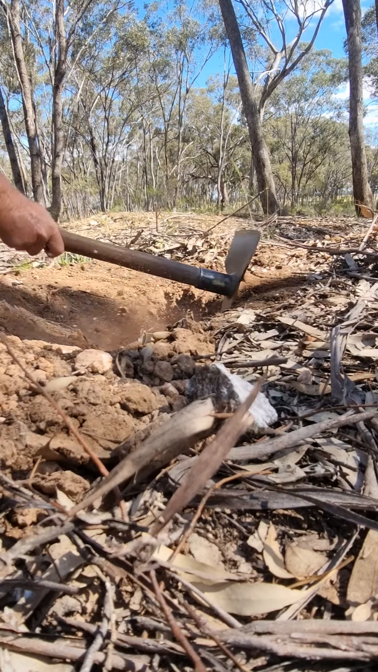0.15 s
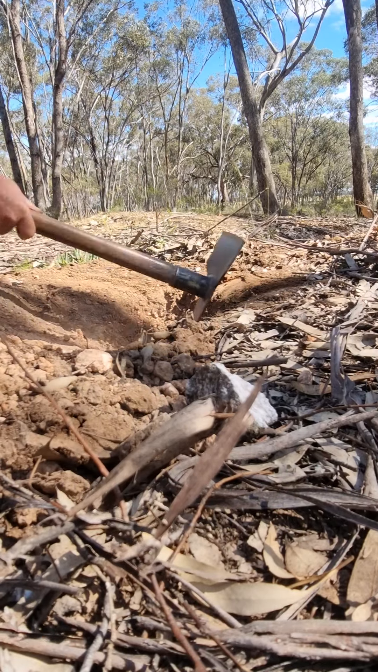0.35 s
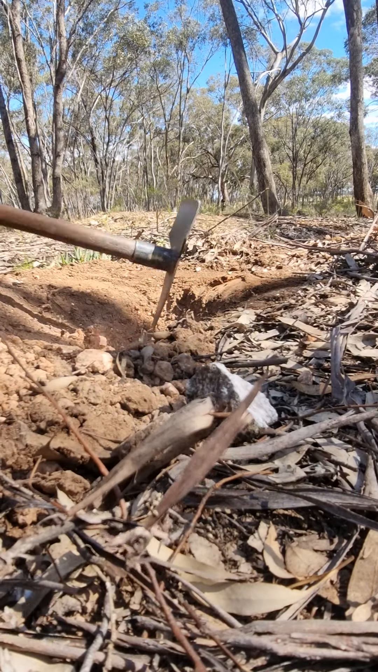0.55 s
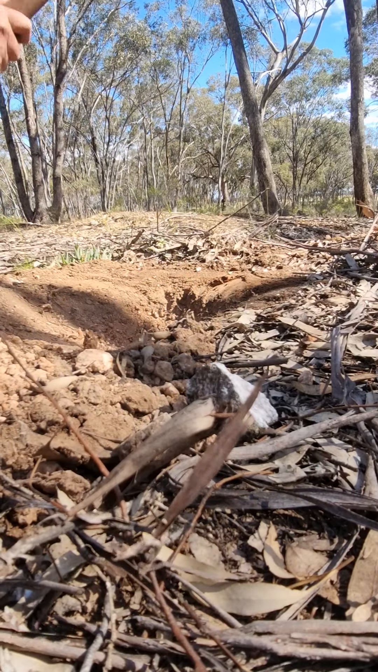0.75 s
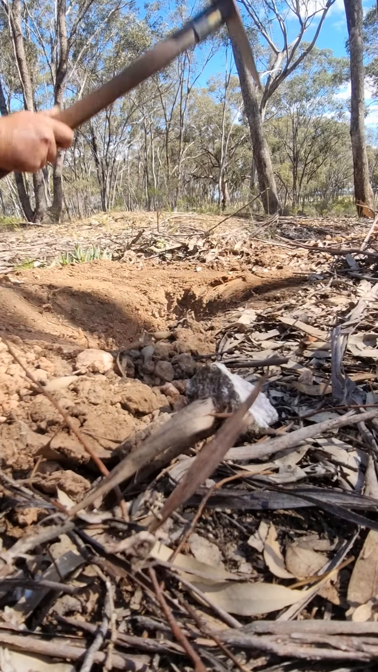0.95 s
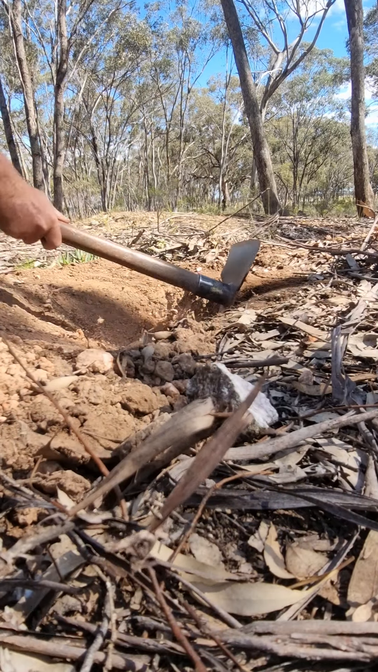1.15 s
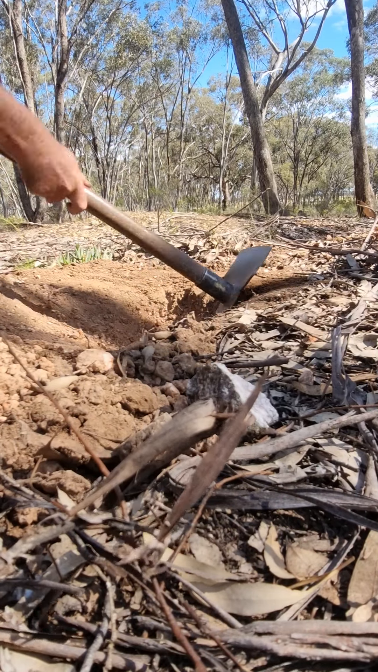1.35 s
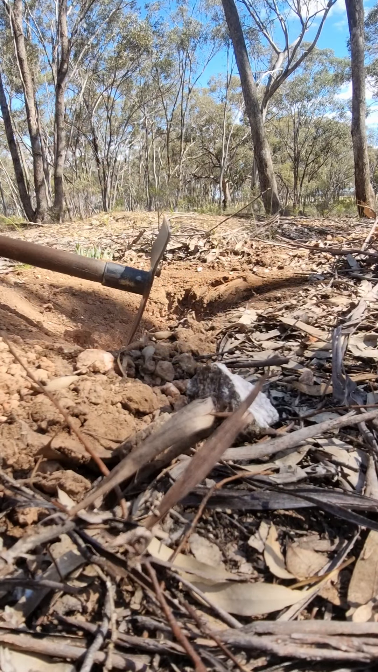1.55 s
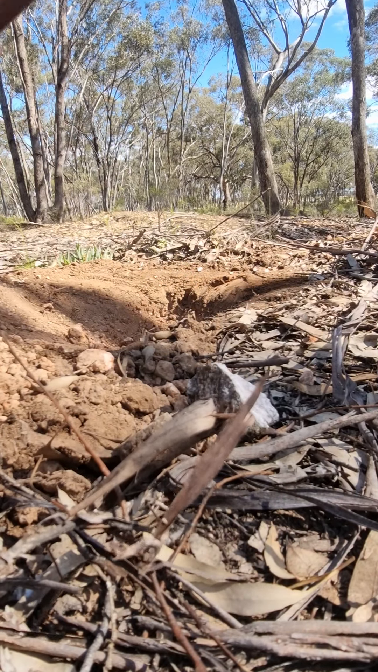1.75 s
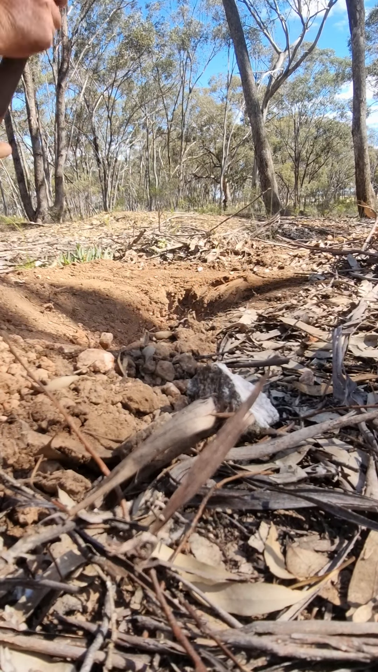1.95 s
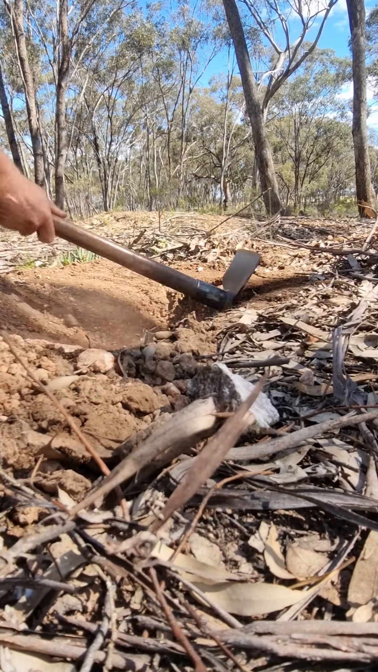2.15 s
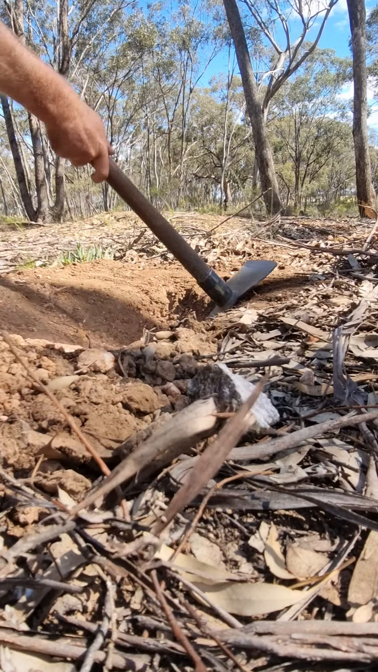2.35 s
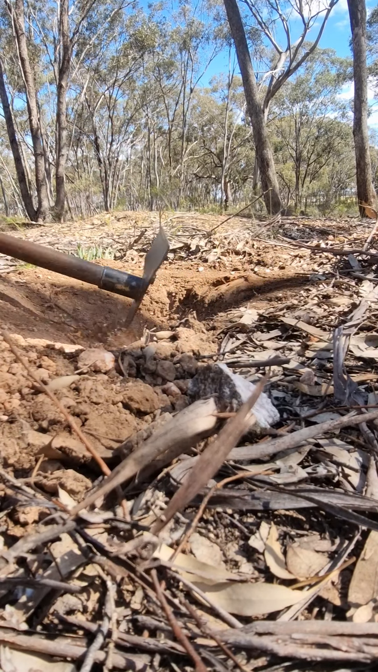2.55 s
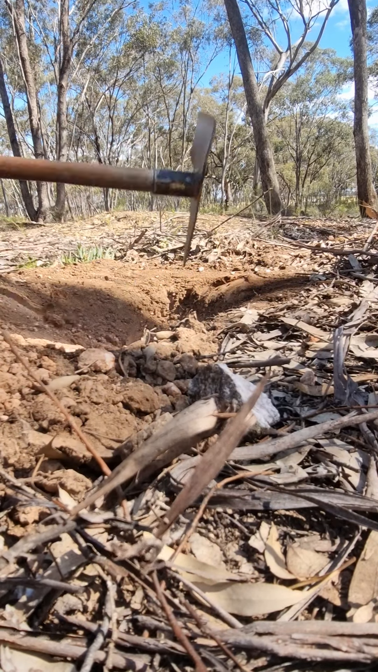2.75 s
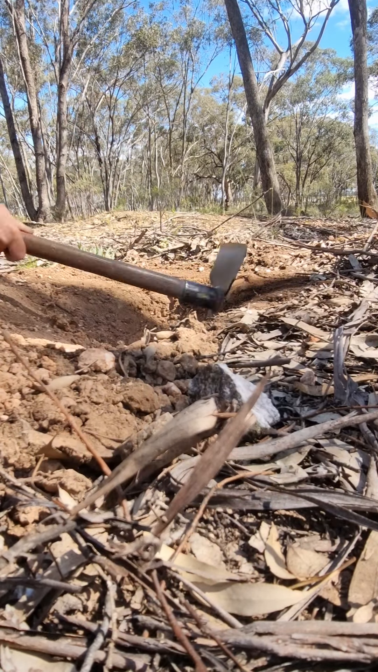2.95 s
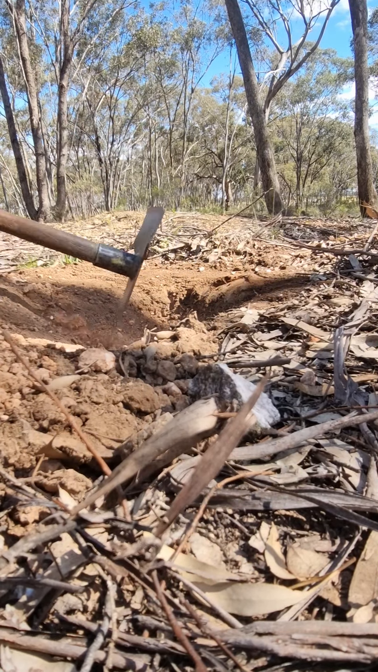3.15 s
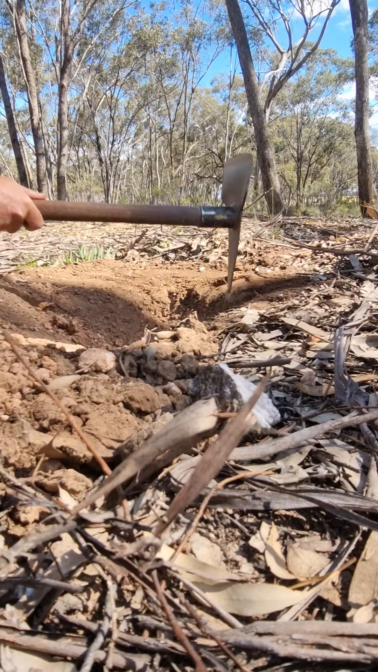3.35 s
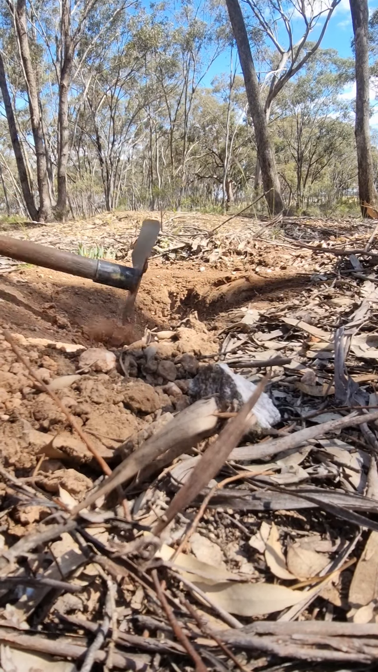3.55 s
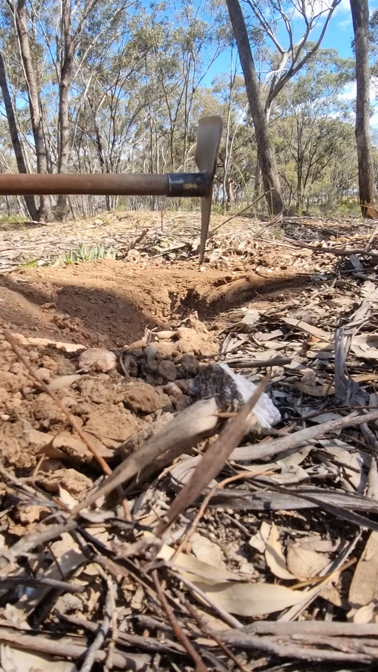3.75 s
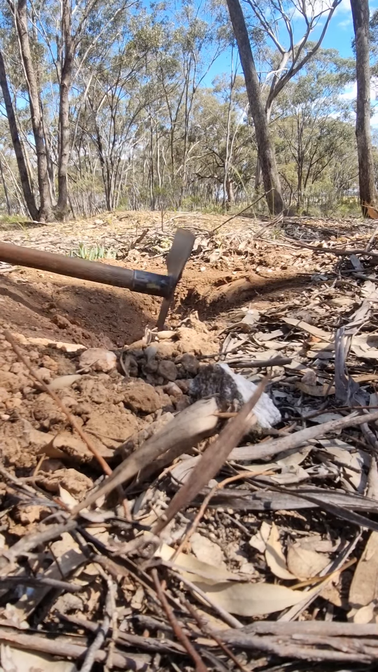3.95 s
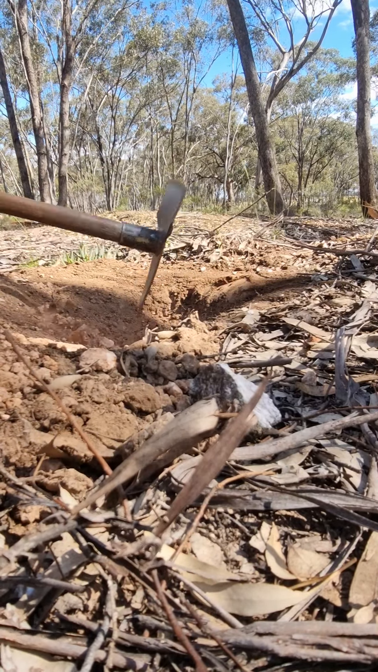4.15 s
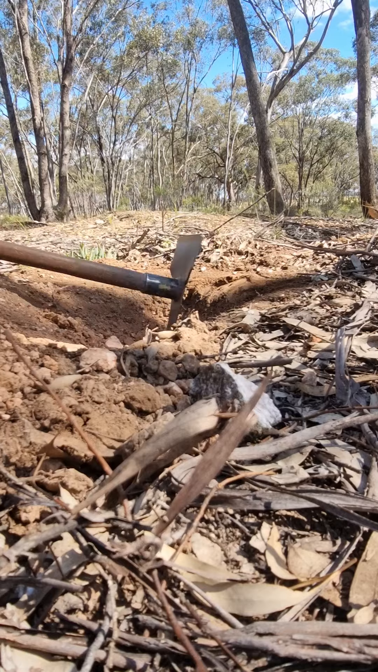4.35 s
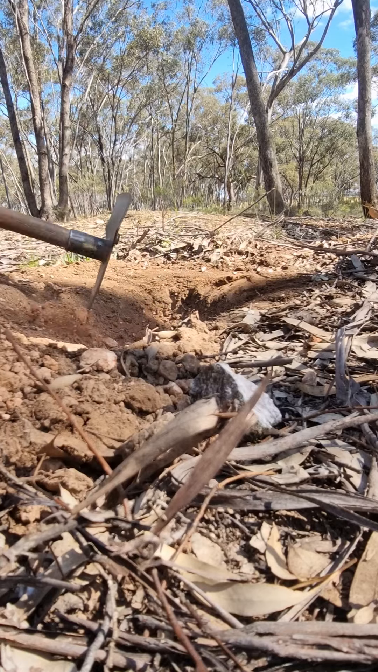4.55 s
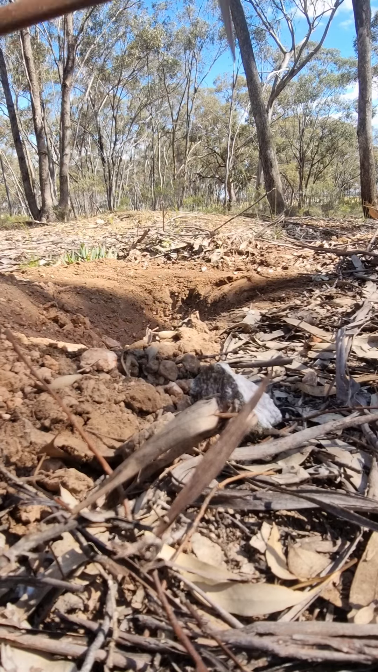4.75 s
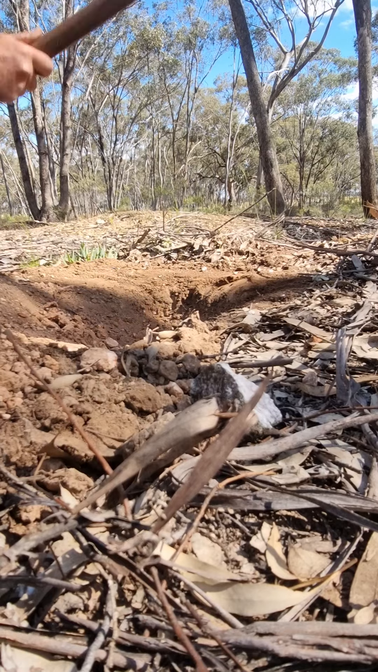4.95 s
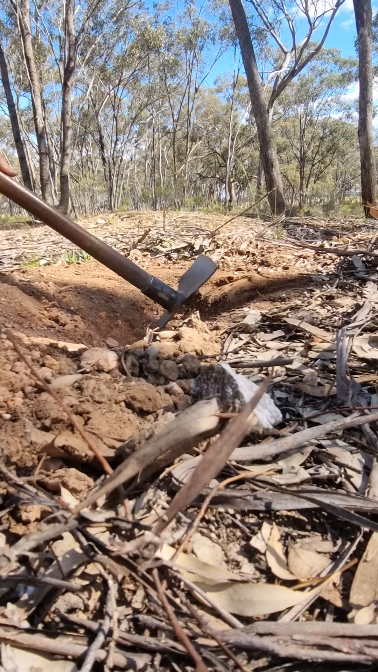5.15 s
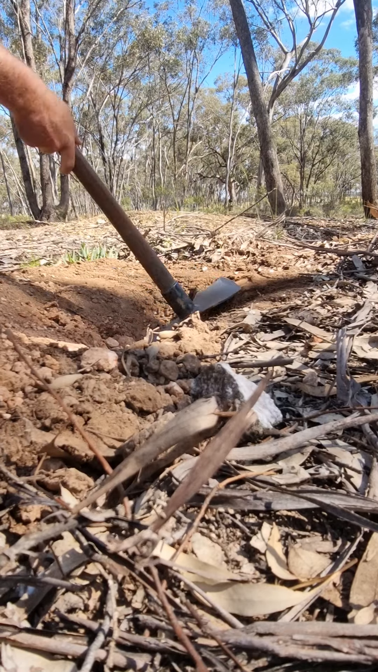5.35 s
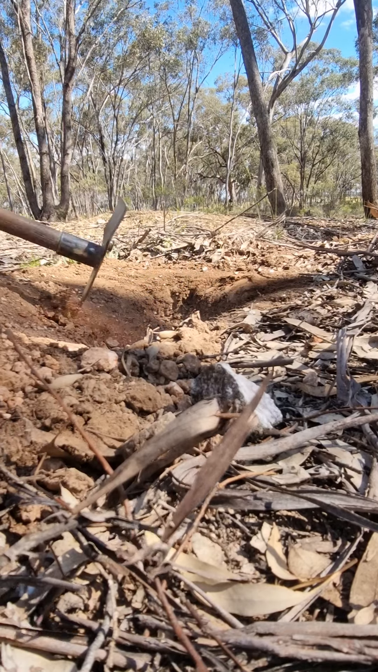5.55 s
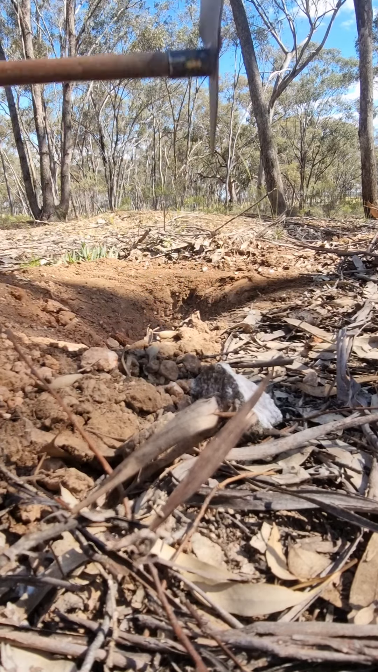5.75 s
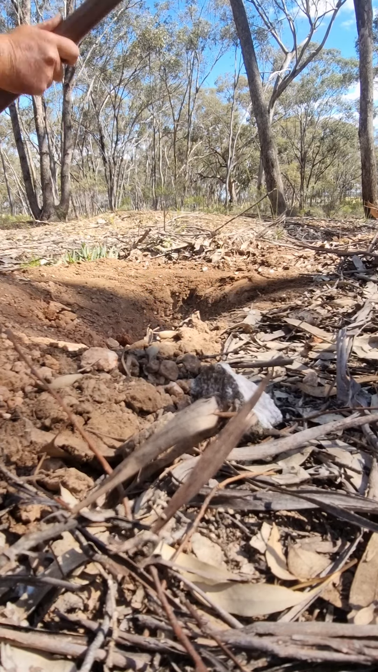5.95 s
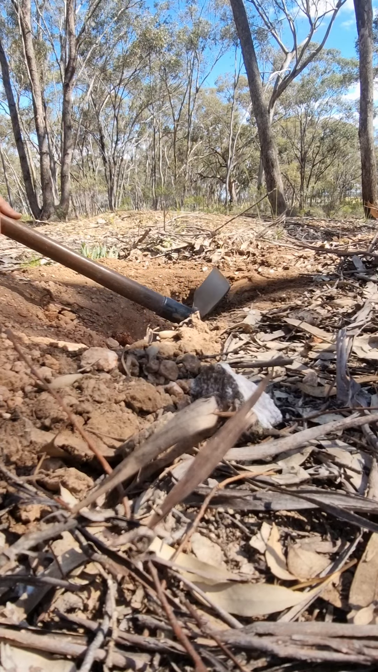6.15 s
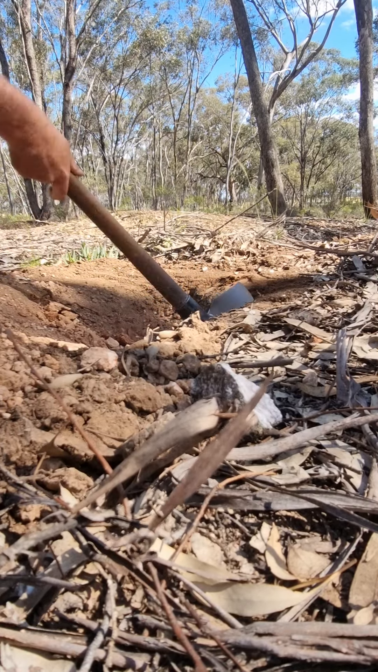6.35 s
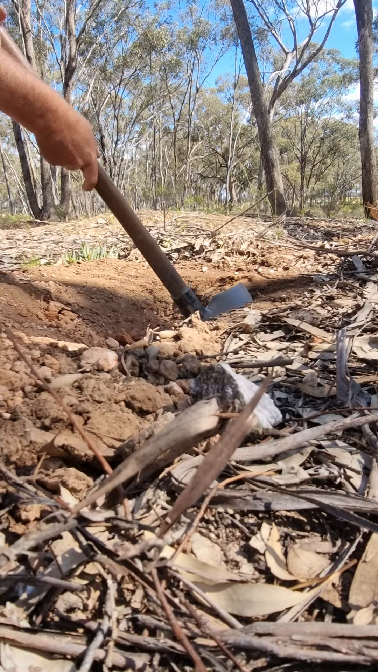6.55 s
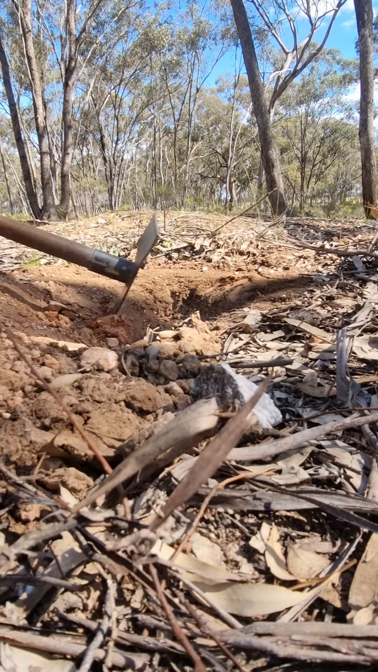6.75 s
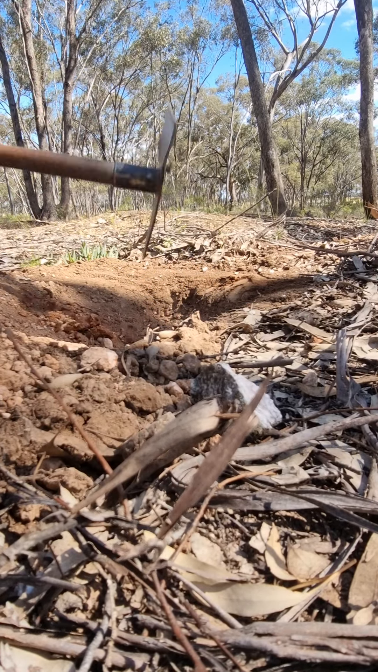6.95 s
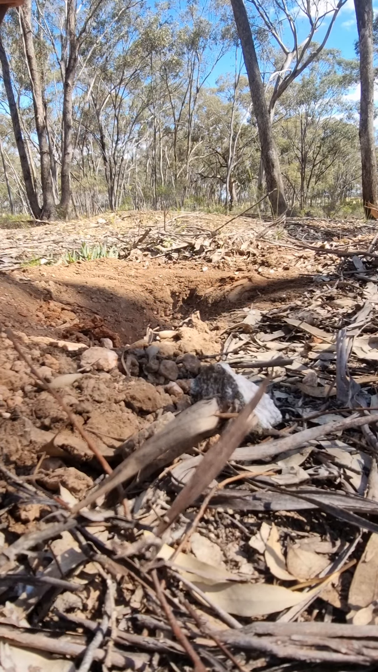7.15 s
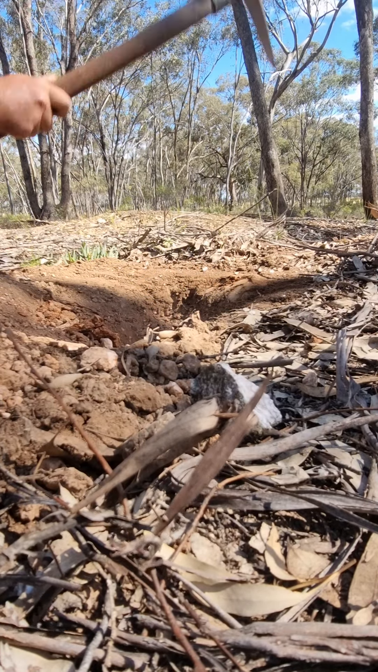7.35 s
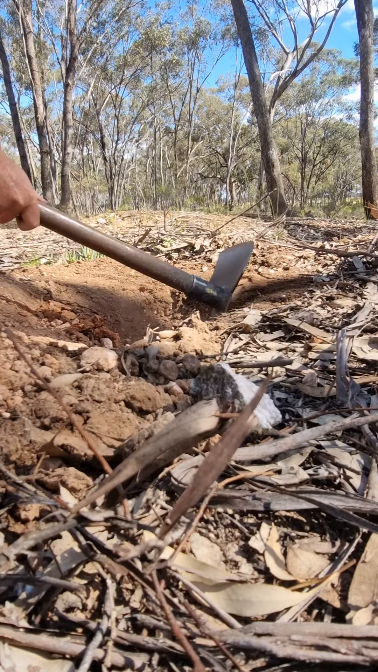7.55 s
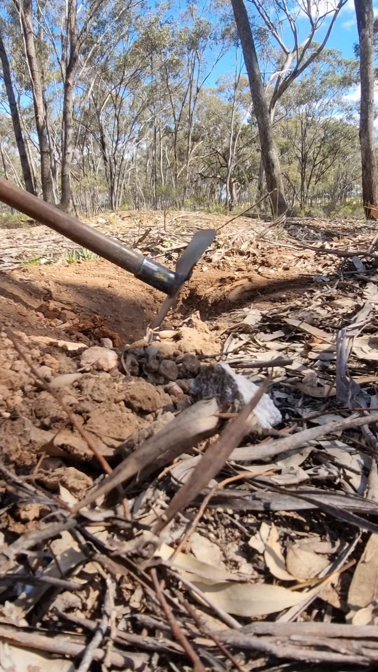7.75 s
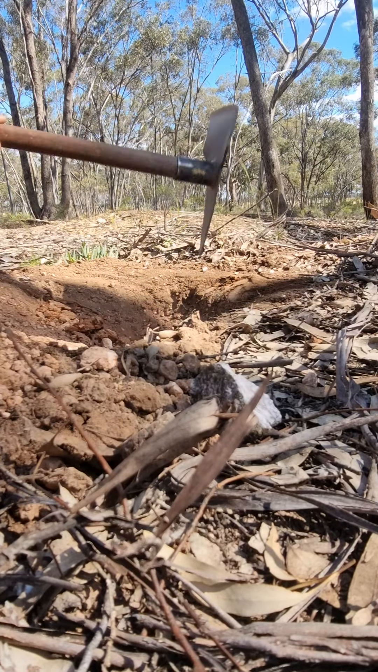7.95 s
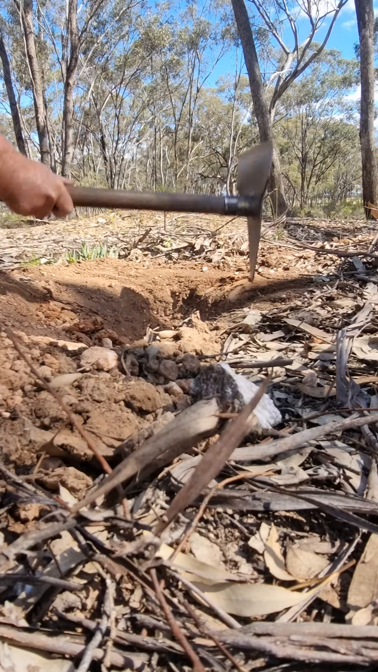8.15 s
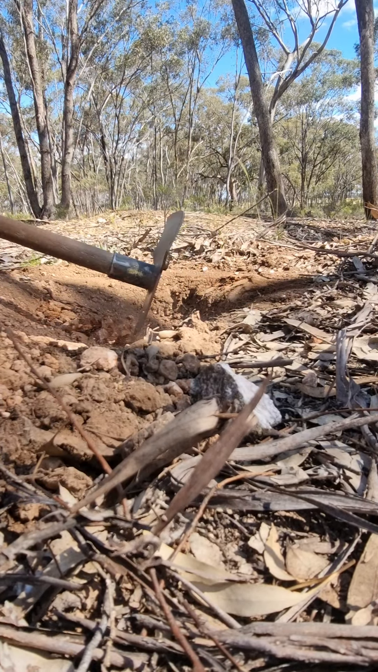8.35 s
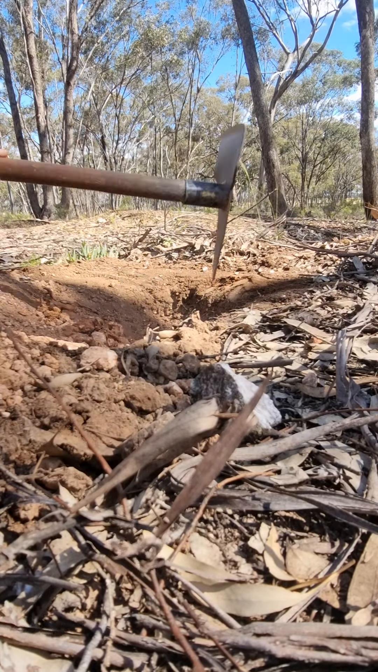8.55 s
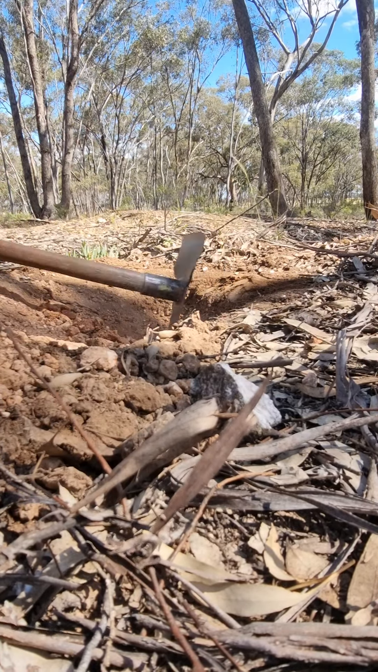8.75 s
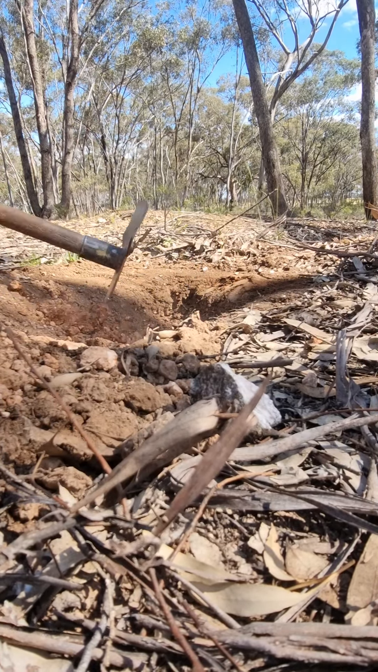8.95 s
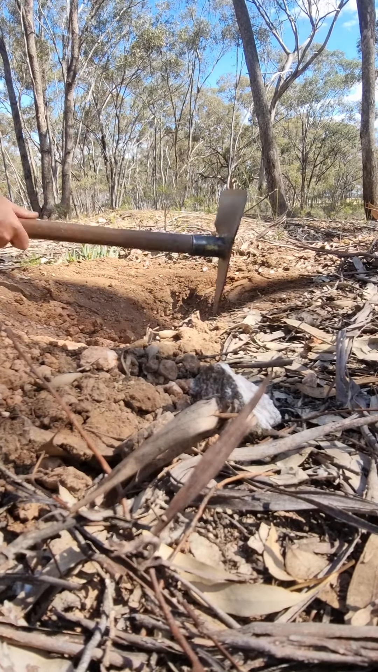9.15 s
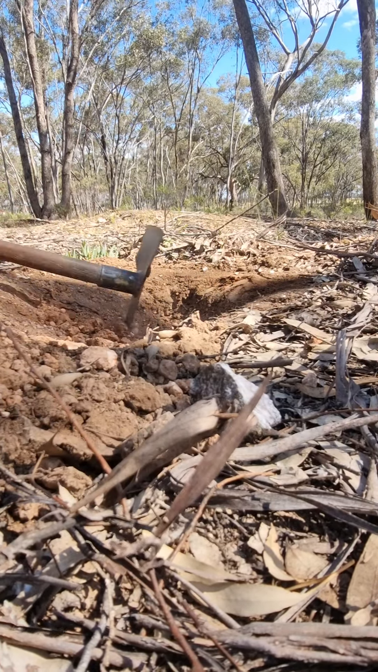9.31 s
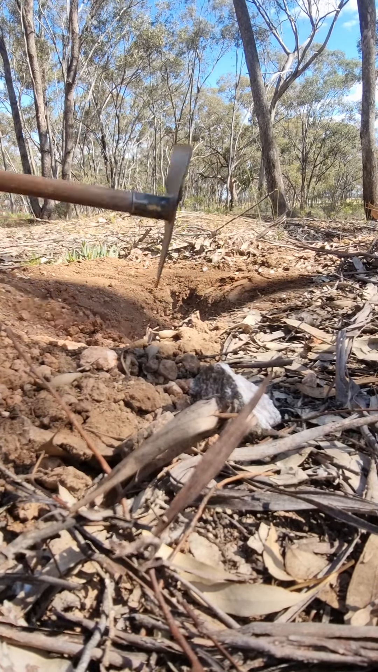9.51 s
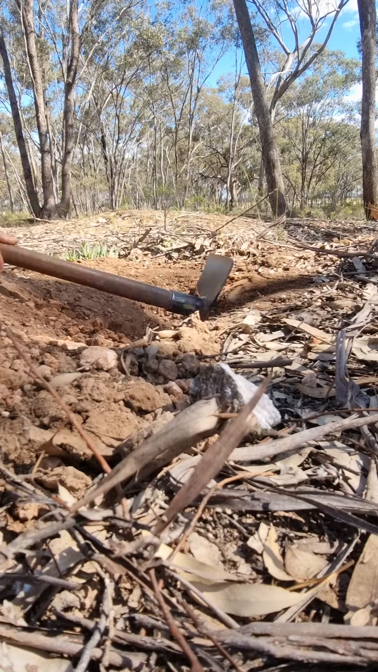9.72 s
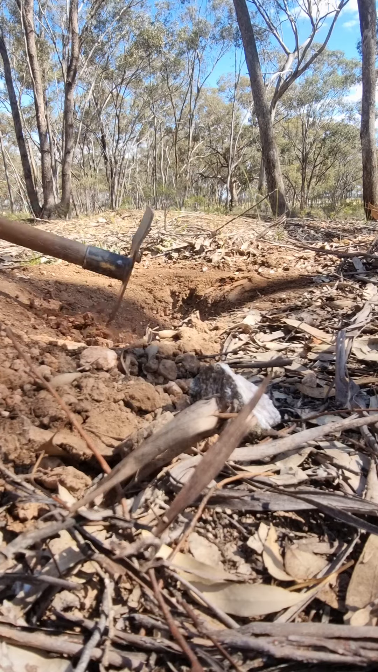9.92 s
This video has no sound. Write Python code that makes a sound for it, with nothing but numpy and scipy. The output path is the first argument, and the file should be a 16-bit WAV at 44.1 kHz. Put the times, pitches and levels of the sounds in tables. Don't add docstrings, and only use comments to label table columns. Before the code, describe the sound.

A small steel pick chops into hard stony ground with gritty crunches, thuds and faint metallic rings, dragged back through grit as low wind rumbles.

```python
import sys
import numpy as np
from scipy import signal
from scipy.fft import rfft, irfft
from scipy.io import wavfile
from scipy.ndimage import uniform_filter1d

SR = 44100
rng = np.random.default_rng(int(sys.argv[2]) if len(sys.argv) > 2 else 0)


def log_audio(samples):
    frames = np.atleast_2d(samples).T
    limited = np.clip(frames, -1, 1)
    pcm = np.round(limited * 32767).astype(np.int16)
    wavfile.write(sys.argv[1], SR, pcm)


def decibels_to_gain(level_db):
    exponent = np.asarray(level_db, float) / 20
    return 10 ** exponent


N = 440118

# frequency in Hz, level in dB.
STONE_COLOUR = [(150, -17), (350, 13.5), (800, 8), (1500, 8.5), (2500, 4.5), (4000, -2), (5000, -13.5),
                (6700, -8.5), (10000, -18), (16000, -22)]
# frequency in Hz, level in dB, t60 in seconds.
BLADE_MODES = [(3240, -3, .025), (3950, -1, .025), (4070, -1, .03), (4210, -2, .06), (5950, -6, .04),
               (6500, -3, .025), (7000, -2, .015), (7240, -5, .03), (10400, -6, .02)]
# frequency in Hz, level in dB, t60 in seconds.
SHANK_MODES = [(340, -3, .04), (395, 0, .06), (590, -5, .035)]
# frequency in Hz, level in dB, t60 in seconds.
RATTLE_MODES = [(1100, -11, .035), (1590, -5, .04), (1680, -1, .065), (2110, -12, .03), (2540, -9, .05)]
# frequency in Hz, level in dB, t60 in seconds.
FREE_MODES = [
    [(4190, -13, .8), (4190, -3, .26), (4226, -10, .14), (4150, -11, .06)],
    [(5230, -4, .09), (5626, -3, .3), (9870, -5, .12), (10060, -9, .08)],
    [(385, -1, .13), (360, -9, .07), (1670, -13, .1)],
]

THUD_LEAD_S = 0.02
CREEP_S, CREEP_DB, CREEP_RISE_S = .016, -25.5, 0.0063
SCATTER_DB = 4


def evened(x):
    return x / np.sqrt(np.mean(x ** 2) + 1e-20)


def read(points, hz):
    f, value = np.transpose(points)
    return np.interp(np.log(hz + 1), np.log(f + 1), value)


def along(rows, t, rest):
    s, *columns = np.transpose(rows)
    return [np.interp(t, s, c, rest, rest) for c in columns]


def add(mix, s, sound):
    part = mix[round(s * SR):][:len(sound)]
    part += sound[:len(part)]


def coloured(x, points):
    log_gain = np.log(decibels_to_gain(read(points, abs(np.fft.fftfreq(4096, 1 / SR)))))
    taps = np.fft.ifft(np.exp(np.conj(signal.hilbert(log_gain)))).real[:1024]
    return signal.oaconvolve(x, taps / np.linalg.norm(taps))[:N]


def treble(x, hz=5000):
    return signal.sosfilt(signal.butter(2, hz, "high", fs=SR, output="sos"), x)


def ring(drive, modes):
    t = np.arange(SR // 2) / SR
    body = sum(decibels_to_gain(db - 60 * t / t60) * np.sin(2 * np.pi * hz * t) for hz, db, t60 in modes)
    return signal.oaconvolve(drive, body)[:N]


def mottled(x, patchy_db):
    z = signal.stft(x, nperseg=256)[2]
    patches = uniform_filter1d(rng.standard_normal(z.shape), 7, 0)
    patches = evened(uniform_filter1d(patches, 3, 1))
    return decibels_to_gain(-patchy_db / 2) * signal.istft(z * decibels_to_gain(patchy_db * patches), nperseg=256)[1][:N]


def runs(rows):
    span_db = 20
    t = np.arange(N) / SR
    levels = []
    for s, db, swell, fade in rows:
        away = np.maximum((s - t) / max(swell, .005), (t - s) / max(fade, .005))
        levels.append(db - span_db * away)
    return np.max(levels, 0)


def blows():
    # start in seconds, crush in dB, clunk in dB, treble in dB, crush length in ms.
    chops = [(0.15, -11, -13, 8, 11.4), (1.1165, -8.5, -19, -13, 7.4), (2.172, -5, -20, -46, 14),
             (3.052, -11.5, -23.5, -0.5, 10.9), (3.501, -30, -30, 9, 24.2), (3.5153, -13, -20.5, -6.5, 7.3),
             (3.973, -21, -22, 4, 12), (4.412, -24, -32.5, 9.5, 5.9), (5.14, -15.5, -16, -5, 7.8),
             (6.174, -16.5, -21.5, -2, 6.5), (7.516, -10, -27.5, 4.5, 12), (8.2758, -10, -17, 9, 1.9),
             (8.281, -10, -26, -4.5, 7.1), (8.802, -19, -21.5, 2.5, 7.7), (9.815, -10.5, -16.5, -42, 8.6)]
    # last crest in seconds, level in dB, pace (1 = usual).
    ground_waves = [(0.1729, -15.5, 1.3), (1.135, -10, 1.05), (2.196, -12.5, 1.24), (3.0721, -18, 0.77),
                    (3.53, -15.5, 1.23), (3.989, -24, 0.97), (4.435, -20.5, 0.78), (5.16, -11, 0.77),
                    (6.195, -18, 1.36), (7.535, -10.5, 1.1), (8.3115, -15.5, 1.33), (8.822, -17, 1.23),
                    (9.3158, -26.5, 0.8), (9.8259, -19, 1.25)]
    # frequency in Hz, level in dB.
    clod_colour = [(150, -11.5), (350, 0), (700, -6), (1200, -3.5), (2000, -13), (5000, -49.5)]
    body, edge, clod, soil = np.zeros((4, N))
    for s, db, clunk_db, treble_db, ms in chops:
        s = s - CREEP_S
        force = crush(.7 * ms, rise=.35, spread_db=3)
        add(body, s - .001, decibels_to_gain(db + 0.5) * force)
        add(edge, s - .001, decibels_to_gain(db + treble_db) * force)
        add(clod, s + 0.003103, decibels_to_gain(clunk_db + 3) * force)
    for s, db, pace in ground_waves:
        add(soil, s - THUD_LEAD_S, decibels_to_gain(db + 3.5) * thud(pace))
    steel = decibels_to_gain(-44.5) * ring(body, BLADE_MODES)
    stone = coloured(treble(body, hz=1494) + treble(edge), STONE_COLOUR)
    return mottled(stone + coloured(clod, clod_colour), patchy_db=1.5) + steel + soil + singing()


def crush(ms, rise, spread_db):
    clicks, luck = rng.standard_normal((2, 3000))
    t = np.arange(3000) / SR - CREEP_S
    u = np.maximum(t, 0) / (max(ms, 1) / 1000)
    shape = np.where(u < rise, np.sin(np.pi / 2 * u / rise) ** 2, np.exp(-(u - rise) ** 2))
    shape = shape + decibels_to_gain(CREEP_DB) * np.exp(-abs(t) / CREEP_RISE_S)
    return shape * clicks * decibels_to_gain(spread_db * evened(uniform_filter1d(luck, 12)))


def thud(pace):
    wave_hz, spread_hz, spread_s = 80, 23.54, 0.0029
    rise_s, full_s, fade_s = 0.007, -0.00114, 0.0041
    t = (np.arange(4000) / SR - THUD_LEAD_S) * pace
    early = np.maximum(t, -4 * spread_s)
    turns = wave_hz * t + spread_hz * spread_s * (1 - np.exp(-early / spread_s))
    u = t - full_s
    swell = np.where(u < 0, np.exp(-(u / rise_s) ** 2), 1 / np.cosh(u / fade_s))
    return swell * np.cos(2 * np.pi * turns)


def singing():
    # start in seconds, blade in dB, overtones in dB, shank in dB.
    releases = [(0.166, -41, -39.5, -50.5), (1.127, -42, -41, -56.5), (2.188, -43, -54, -45),
                (2.623, -39, -47, -57), (2.645, -36, -59, -57), (3.0632, -27.5, -53, -32),
                (3.1406, -42.5, -62, -15.5), (3.209, -45.5, -67, -62), (3.606, -34.5, -70, -57),
                (3.5736, -49, -55, -24), (3.9897, -45, -56, -31.5), (4.06, -59, -62, -36),
                (4.093, -44, -58, -32), (4.515, -48, -60, -24.5), (4.6, -48, -65, -46),
                (5.147, -42.5, -69, -61), (5.581, -45.5, -73, -37), (6.1834, -36.5, -63, -33),
                (6.651, -47.5, -75, -49), (6.774, -36, -64, -55), (6.705, -52.5, -73, -59),
                (6.8141, -30, -66, -32.5), (7.524, -28, -47, -27), (7.7674, -40.5, -77, -47),
                (8.2966, -35, -59.5, -34), (8.374, -46, -58, -44), (8.806, -57, -46, -56),
                (8.8996, -48, -63, -32), (8.965, -44, -63, -36), (9.4016, -41.5, -61, -35),
                (9.8261, -55, -43, -28.5)]
    touches = [1.3, 2.35, 2.692, 3.118, 3.203, 3.665, 5.3, 6.33, 6.89, 7.9, 8.345, 8.44, 9.09, 10]
    # start in seconds, level in dB.
    head_knocks = [(0.41, -38), (0.434, -37), (1.508, -33), (1.544, -37), (2.5, -51), (2.571, -35),
                   (2.619, -41), (3.63, -38), (4.499, -36), (5.449, -48), (5.58, -41), (6.482, -33.5),
                   (6.612, -35), (6.687, -21), (6.742, -43), (6.761, -33.5), (6.815, -25), (7.769, -41),
                   (7.785, -44), (7.83, -51), (7.867, -38), (1.344, -48), (0.51, -60), (9.339, -29)]
    # frequency in Hz, level in dB, t60 in seconds.
    head_modes = [(1675, 0, .1), (2540, -10, .09), (1100, -12, .06)]
    damp_s, lead_s = .006, .008
    out, knocks = np.zeros((2, N))
    t = np.arange(SR // 2) / SR
    tones = [ring(np.ones(1), modes) for modes in FREE_MODES]
    for s, *levels in releases:
        free = min(stop for stop in touches if stop > s) - s + lead_s
        damping = np.exp(-np.maximum(t - free, 0) / damp_s)
        add(out, s - lead_s, damping * sum(decibels_to_gain(db + 6.5) * tone for db, tone in zip(levels, tones)))
    for s, db in head_knocks:
        add(knocks, s, decibels_to_gain([db + 7.5]))
    return out + ring(knocks, head_modes)


def catches():
    # time in seconds, crush in dB, shank ring in dB, rattle in dB.
    pry_rows = [(3.129, -26, -45, -40), (3.121, -15.5, -54, -45.5), (3.195, -25.5, -24.5, -66),
                (3.559, -36, -19.5, -34.5), (3.584, -11.5, -32, -34), (3.64, -48, -31, -57),
                (4.056, -18.5, -26, -40.5), (4.096, -31, -53, -41), (4.129, -26, -28, -59),
                (4.445, -23, -29, -51), (4.481, -25.5, -17.5, -46), (4.496, -47, -30, -30.5),
                (4.514, -34.5, -34, -34), (4.592, -19.5, -31, -44.5), (8.29, -4.5, -16, -32),
                (8.297, -14.5, -32, -71), (8.348, -21, -25, -43), (8.373, -16.5, -23.5, -52.5),
                (8.421, -24, -21.5, -46.5), (8.434, -31, -26.5, -55), (8.847, -50, -34, -43),
                (8.894, -25, -40, -37), (8.938, -23, -24, -52), (8.955, -19, -63, -45),
                (9.289, -22.5, -43, -41.5), (9.296, -9, -23.5, -62), (9.337, -12, -22.5, -34.5),
                (9.39, -26.5, -40, -45.5), (9.399, -5, -51, -29.5), (9.433, -8, -24, -65),
                (9.863, -42, -48, -50), (9.893, -39.5, -37, -45.5), (9.943, -50, -33, -43.5)]
    # time in seconds, crush in dB, rattle in dB, blade ring in dB.
    drag_rows = [(0.38, -49, -72, -47.5), (0.395, -31.5, -71, -40.5), (0.409, -36, -59, -44),
                 (0.432, -24, -65, -34.5), (0.474, -21, -67, -68), (0.494, -23.5, -46, -52),
                 (0.511, -21, -43, -51), (1.342, -29, -50.5, -44.5), (1.475, -54, -58, -47),
                 (1.508, -45, -28, -35), (1.542, -20, -51, -54), (1.594, -34.5, -67, -55),
                 (2.486, -61, -44.5, -40), (2.566, -17.5, -63, -44), (2.616, -9, -29, -48),
                 (2.651, -24, -42, -59), (5.53, -30, -44, -43.5), (5.562, -28.5, -56, -36.5),
                 (5.58, -23, -49, -47.5), (5.611, -39, -64, -47), (5.66, -49, -49.5, -47),
                 (6.482, -31, -31.5, -43), (6.61, -32, -48, -70), (6.684, -19, -41.5, -44),
                 (6.501, -26.5, -47, -68), (6.656, -45, -39, -55), (6.742, -49, -58, -64),
                 (6.764, -40.5, -48, -45), (6.808, -5, -28.5, -33.5), (7.557, -28, -60, -58),
                 (7.64, -42, -64, -58), (7.728, -37, -60, -57), (7.745, -42, -66, -63),
                 (8.832, -33.5, -55, -61), (8.868, -30, -45, -52), (7.763, -34, -46.5, -47.5),
                 (7.784, -22.5, -44, -72), (7.856, -47, -39.5, -42), (7.879, -26, -69, -42.5)]
    pry_ms, pry_blade_db = 6.5, 1
    drag_ms, drag_shank_db = 7.5, -13
    length_spread = 0.25
    body, shank, head, blade = np.zeros((4, N))
    pries = [(s, db, shank_db, rattle_db, rattle_db + pry_blade_db, pry_ms)
             for s, db, shank_db, rattle_db in pry_rows]
    drags = [(s, db, db + drag_shank_db, rattle_db, ring_db, drag_ms)
             for s, db, rattle_db, ring_db in drag_rows]
    for s, db, shank_db, rattle_db, ring_db, usual_ms in pries + drags:
        ms = usual_ms * (1 + length_spread * rng.uniform(-1.1, 1))
        force = crush(1.434 * ms, rise=0.43, spread_db=6.5)
        start = s - .5 * ms / 1000 - CREEP_S
        add(body, start, decibels_to_gain(db - 12.5) * force)
        push = force / np.linalg.norm(force)
        add(shank, start, decibels_to_gain(shank_db + 0.5) * push)
        add(head, start, decibels_to_gain(rattle_db + 15.0) * push)
        add(blade, start, decibels_to_gain(ring_db + 1.5) * push)
    stone = mottled(coloured(body, STONE_COLOUR), patchy_db=2.6)
    return stone + ring(shank, SHANK_MODES) + ring(head, RATTLE_MODES) + ring(blade, BLADE_MODES)


def grit():
    # fullest moment in seconds, level in dB, swell in seconds, fade in seconds.
    grit_runs = [(0.165, -41.5, .01, 0.28), (0.5, -48, 0.4, 0.15), (1.14, -50, .01, 0.67),
                 (1.55, -37, 0.098, 0.052), (2.195, -43, 0.016, 0.26), (2.565, -42, 0.094, 0.088),
                 (2.67, -37.5, 0.074, 0.2), (3.08, -40, 0.0061, 0.17), (3.535, -32.5, 0.015, 0.15),
                 (3.995, -35, 0.015, 0.17), (4.53, -35.5, 0.1, 0.076), (5.55, -52.5, 0.68, 0.44),
                 (6.7, -42, 0.15, 0.33), (7.85, -54.5, 1, 0.45), (8.295, -40.5, .01, 0.29),
                 (8.825, -34.5, 0.017, 0.16), (9.285, -29.5, 0.0041, 0.19), (9.88, -37.5, 0.046, 1)]
    clicks_per_s = 7000
    size = decibels_to_gain(3.5 * np.minimum(rng.exponential(1, N), 4)) * (rng.random(N) < clicks_per_s / SR)
    clumps = decibels_to_gain(2.2 * evened(uniform_filter1d(rng.standard_normal(N), 400)))
    force = decibels_to_gain(runs(grit_runs) + 4.0) * evened(size * clumps * rng.choice([-1, 1], N))
    heard = mottled(coloured(force + decibels_to_gain(-7.5) * treble(force), STONE_COLOUR), patchy_db=2.6)
    hum = decibels_to_gain(-46.5) * ring(force, BLADE_MODES) + decibels_to_gain(-37.5) * ring(force, RATTLE_MODES)
    hum += decibels_to_gain(-26.0) * ring(force, SHANK_MODES) + decibels_to_gain(-48) * ring(force, FREE_MODES[0])
    return heard + hum


def slides():
    # fullest moment in seconds, level in dB, swell in seconds, fade in seconds.
    soil_runs = [
        (0.18, -51.5, 0.011, 0.42),
        (2.25, -40, 0.088, 0.062),
        (6.21, -46.5, 0.079, 0.25),
        (6.45, -41, 0.065, 0.054),
        (8.47, -43, 0.057, 0.107),
        (9.48, -40.5, 0.04, 0.14),
    ]
    clumps = decibels_to_gain(2.5 * evened(uniform_filter1d(rng.standard_normal(N), 60)))
    crumbs = evened(rng.standard_normal(N) * clumps)
    colour = [(600, -11.0), (1900, -1), (2700, 12.5), (3800, -5.5), (9000, -28.5)]
    return decibels_to_gain(runs(soil_runs) + 4.0) * coloured(crumbs, colour)


def clods():
    # landing in
    # seconds, level in dB, pitch in Hz, treble in dB.
    landings = [(0.204, -40, 598, -0.5), (0.287, -39.5, 805, -2.5), (0.7038, -65, 600, 8.5),
                (0.754, -57, 538, -18), (1.699, -57, 486, 3.5), (2.316, -56.5, 458, 9.5),
                (2.337, -30.5, 864, -1.5), (2.399, -57, 506, 4), (2.452, -60, 600, 9),
                (2.658, -45, 800, 1.5), (2.668, -44, 700, 3), (2.676, -48.5, 900, 1.5),
                (2.691, -30, 1120, 1), (2.71, -41.5, 452, -8), (2.723, -25.5, 560, -1.5),
                (2.748, -5, 990, -20), (2.756, -18, 686, -3.5), (2.775, -36, 514, -1),
                (2.765, -43, 700, -0.5), (2.784, -50, 700, 4), (2.79, -56, 700, 2), (2.8115, -56, 452, 12),
                (2.839, -38.5, 710, -2), (2.853, -52, 608, -8), (2.887, -53, 894, -1),
                (2.9, -36.5, 896, -4), (2.952, -56.5, 700, 7.5), (2.97, -62, 600, 3),
                (4.221, -24, 664, -45), (4.789, -44, 550, -14), (8.028, -47, 500, -5),
                (9.105, -21.5, 660, -8.5), (9.797, -29.5, 1105, 4), (9.8155, 0, 740, -30),
                (5.1435, -5.5, 360, -31), (6.81, -24, 620, -33)]
    # time in seconds, level in dB.
    crumb_curve = [
        (2.64, -101),
        (2.704, -47),
        (2.82, -76.5),
    ]
    heavy_db, crumbs_per_s = -27, 900
    knocks, ticks = np.zeros((2, N))
    t = np.arange(800) / SR
    for s, db, hz, treble_db in landings:
        add(knocks, s + .001, decibels_to_gain(db) * np.sin(2 * np.pi * hz * t) * np.exp(-t * hz / .8))
        tick = rng.standard_normal(800)
        if db > heavy_db:
            tick = 2 * uniform_filter1d(tick, size=5)
        add(ticks, s + .001, decibels_to_gain(db + treble_db + 8) * tick * np.exp(-t / .0012))
    db, = along(crumb_curve, np.arange(N) / SR, -120)
    crumbs = decibels_to_gain(5.0 * np.minimum(rng.exponential(1, N), 4)) * (rng.random(N) < crumbs_per_s / SR)
    patter = decibels_to_gain(db + 7.5) * evened(crumbs * rng.choice([-1, 1], N))
    colour = [(500, -18.0), (1500, 4.0), (4000, 4.0), (8000, -4.0), (16000, -6.0)]
    return knocks + coloured(ticks + patter, colour)


def scatter(x):
    shift_per_s = 3.7
    t = np.arange(2000) / SR
    tails = rng.standard_normal((2, 2, 2000)) * decibels_to_gain(-60 * t / .018) * (t > .0003)
    bright = coloured(x, [(100, -22), (1000, -19), (2200, -15), (4000, -6), (9000, 0)])
    turn = 2 * np.pi * shift_per_s * np.arange(N) / SR
    out = np.zeros((2, N))
    for k, tail in enumerate(tails):
        spot = bright * np.cos(turn + k * np.pi / 2)
        out += signal.oaconvolve(spot[None], tail / np.linalg.norm(tail[0]), axes=1)[:, :N]
    return out


def wind():
    # time in seconds, level in dB.
    gust_curve = [(0.0, -43.5), (0.44, -49), (0.97, -46), (1.28, -51.5), (1.8, -52.5), (2.08, -47.5),
                  (2.92, -55), (3.47, -57), (3.67, -50), (4.89, -58.5), (5.23, -46), (5.78, -53.5),
                  (6.17, -45), (6.42, -53.5), (6.95, -54.5), (7.23, -58), (9.76, -69.5), (9.98, -72)]
    # time in seconds, left over right in dB.
    gust_lean = [
        (0.0, -3.5),
        (5.75, 12),
        (6.0, 4),
        (7.0, 19),
        (7.31, 1.5),
        (9.98, 2),
    ]
    # centre in seconds, level in dB, pitch in Hz, length in seconds.
    slaps = [(0.093, -31, 89.5, 0.026), (0.27, -33, 63, .04), (0.624, -22, 60, 0.0095),
             (0.701, -24.5, 64.5, 0.027), (0.763, -21.5, 80, 0.021), (0.826, -32, 70.4, 0.032),
             (1.06, -28, 65, 0.019), (1.49, -23.5, 53.5, 0.032), (1.556, -27.5, 95, 0.016),
             (1.894, -35, 80, 0.073), (2.037, -29.5, 60, 0.032), (4.957, -32, 68, 0.013),
             (5.081, -30.5, 85, 0.039), (5.254, -30, 70, 0.0062), (5.315, -36, 60, 0.015),
             (5.392, -31, 69, 0.018), (5.572, -30, 60.7, 0.02), (6.08, -19, 71, 0.01),
             (6.306, -30, 65, 0.0061), (6.625, -26.5, 71, 0.011), (6.723, -36, 70, 0.02),
             (7.022, -35.5, 59.4, 0.014)]
    # frequency in Hz, level in dB.
    roar_colour = [(20, -33.5), (40, -5.5), (65, 2.5), (90, -5.5), (140, -13.5), (250, -23.5), (500, -44),
                   (1000, -80)]
    t = np.arange(N) / SR
    db, = along(gust_curve, t, None)
    pan_db, = along(gust_lean, t, None)
    eddies = np.zeros((2, N))
    u = np.arange(-4000, 4000) / SR
    for s, eddy_db, hz, length in slaps:
        phase, skew, lean = rng.random(3)
        turns = phase, phase + 0.99 * (skew - .5)
        for port, turn, side in zip(eddies, turns, (lean - .5, .5 - lean)):
            wave = np.exp(-(u / length) ** 2) * np.sin(2 * np.pi * (hz * u + turn))
            add(port, max(s - 4000 / SR, 0), decibels_to_gain(eddy_db + 3.0 + 9 * side) * wave)
    roar = decibels_to_gain(db + 13.5) * air(roar_colour, 0.41, patchy_db=2.0, wide=12, long=3, size=2048)
    return decibels_to_gain([pan_db / 2, -pan_db / 2]) * (roar + eddies)


def leaves():
    # time in seconds, level in dB.
    hiss_curve = [
        (0.0, -58),
        (2.25, -56.5),
        (2.64, -58),
        (3.22, -57),
        (9.87, -53),
        (9.98, -51),
    ]
    # frequency in Hz, level in dB.
    hiss_colour = [(59, -4), (100, -1), (273, -15), (352, -6.5), (1570, -23.5), (2670, -21), (6550, -28.5),
                   (9830, -40), (15100, -47.5), (16400, -58)]
    db, = along(hiss_curve, np.arange(N) / SR, None)
    return decibels_to_gain(db + 8.5) * air(hiss_colour, 0.16, patchy_db=1.47, wide=20, long=30, size=1024)


def air(points, same, patchy_db, wide, long, size):
    frames, hz = 4 * N // size + 5, np.fft.rfftfreq(size, 1 / SR)
    a, b, c, d, patches = rng.standard_normal((frames, len(hz), 5)).T
    patches = evened(uniform_filter1d(uniform_filter1d(patches, wide, 0), long, 1))
    left = a + 1j * b
    right = same * left + np.sqrt(1 - same ** 2) * (c + 1j * d)
    z = np.array([left, right]) * decibels_to_gain(read(points, hz)[:, None] + patchy_db * patches)
    return evened(signal.istft(z, nperseg=size, noverlap=3 * size // 4)[1][:, :N])


def dipped(x):
    centre_hz, width_hz, depth_db = 8600, 430, -20
    hz = np.fft.rfftfreq(N, 1 / SR)
    dip_db = depth_db * np.exp(-((hz - centre_hz) / width_hz) ** 4)
    return irfft(rfft(x, axis=-1) * decibels_to_gain(dip_db), N)


def ports(side, front, gusts):
    # frequency in Hz, phase in radians the casing adds to the left lead.
    casing_lead = [(0, 0), (170, .3), (850, .6), (1100, 1.1), (1600, 1.1), (2600, .7), (3900, .7),
                   (4650, -.7), (5700, .2), (8000, 0), (9300, -1), (11000, .5), (12500, 2), (16000, 2.6)]
    # frequency in Hz, left over right in dB.
    port_balance = [(60, -3.5), (180, -3), (550, -4.5), (1650, 1), (4970, -0.5), (15000, 9)]
    # frequency in Hz, level in dB.
    port_colour = [(20, -20.5), (45, -8), (70, -5), (6300, -2.5), (7400, -3), (8000, -11), (8700, -8.5),
                   (10000, -5.5), (12000, -6), (15200, -1.5), (16200, 11), (16600, -44)]
    gap_s = 6 / SR
    hz = np.fft.rfftfreq(N, 1 / SR)
    lead = 2 * np.pi * hz * gap_s + np.interp(hz, *np.transpose(casing_lead))
    half = decibels_to_gain(read(port_balance, hz) / 2) * np.exp(.5j * lead)
    heard = rfft(side, axis=-1) * np.array([half, 1 / half]) + rfft(front + gusts, axis=-1)
    return irfft(heard * decibels_to_gain(read(port_colour, hz)), N)


def scene():
    work = blows() + catches() + grit() + slides()
    debris = clods()
    side = dipped(work + decibels_to_gain(SCATTER_DB) * scatter(work)) + leaves()
    return ports(side, debris + decibels_to_gain(SCATTER_DB) * scatter(debris), wind())


def band_limit(x):
    return signal.sosfilt(signal.butter(12, 15850, fs=SR, output="sos"), x)


def record(dry):
    low_pass = signal.firwin(255, 15950, window=("kaiser", 9), fs=SR)
    mix = signal.oaconvolve(np.clip(dry, -1, 1), low_pass[None], "same")
    return band_limit(mix)


dry = scene()
out = record(dry)
log_audio(out)
```